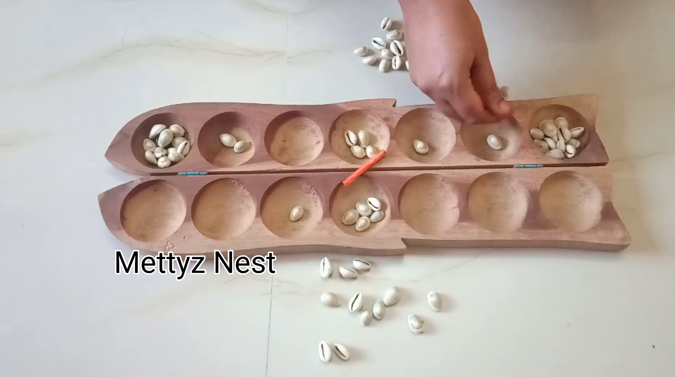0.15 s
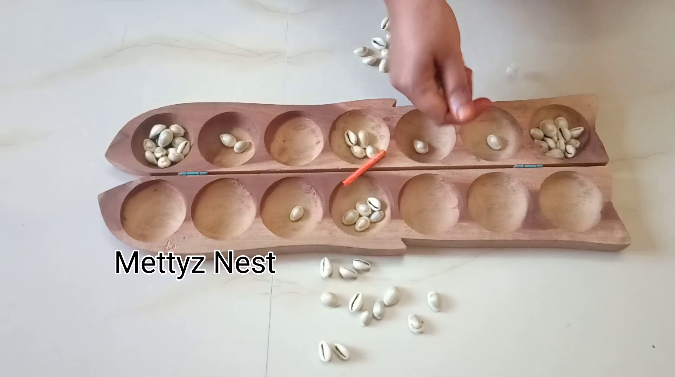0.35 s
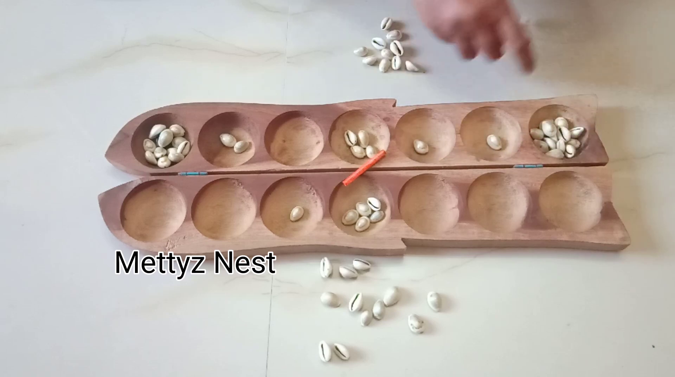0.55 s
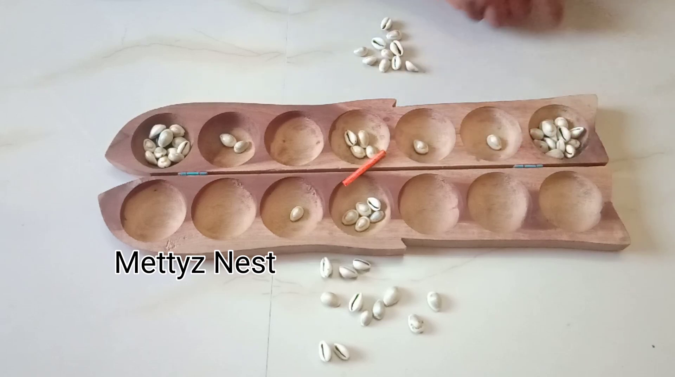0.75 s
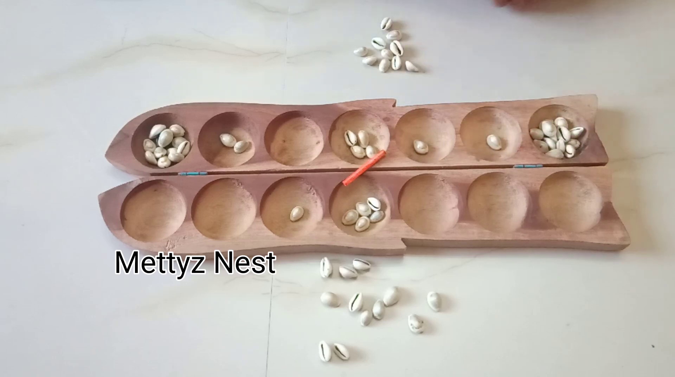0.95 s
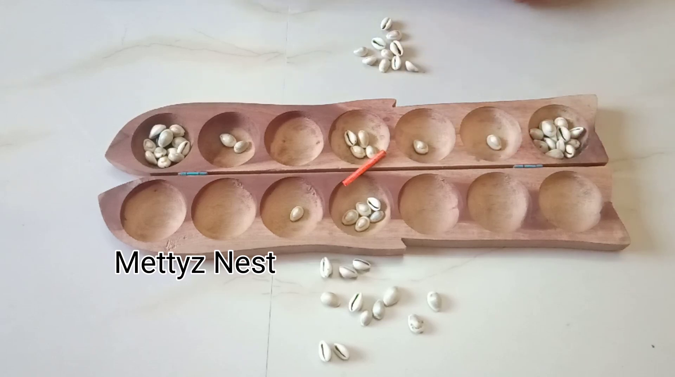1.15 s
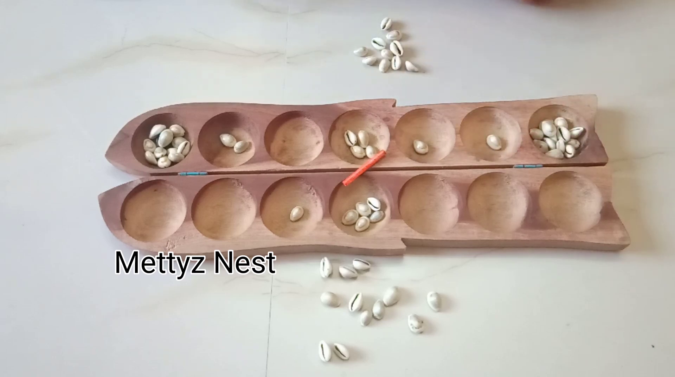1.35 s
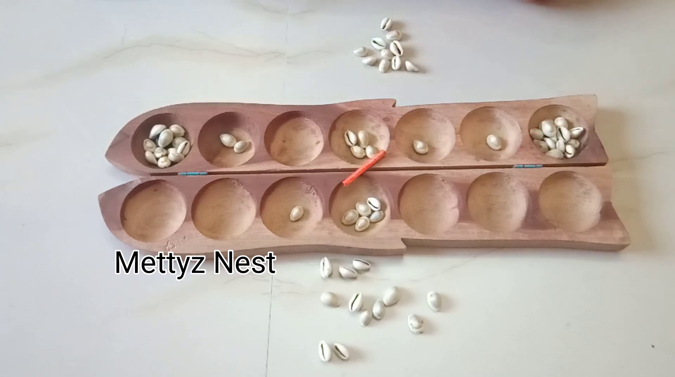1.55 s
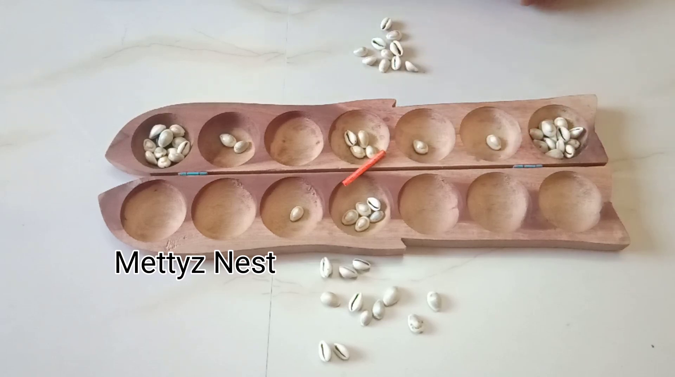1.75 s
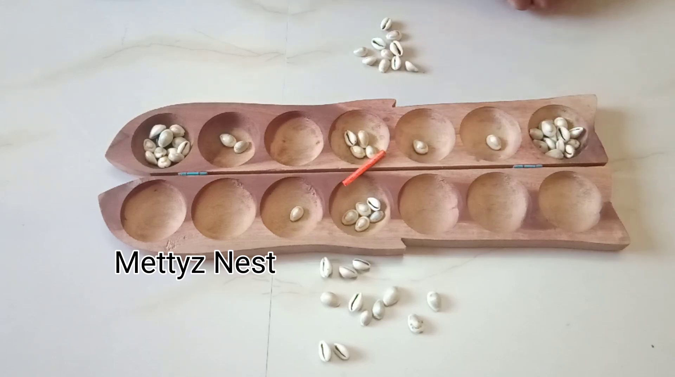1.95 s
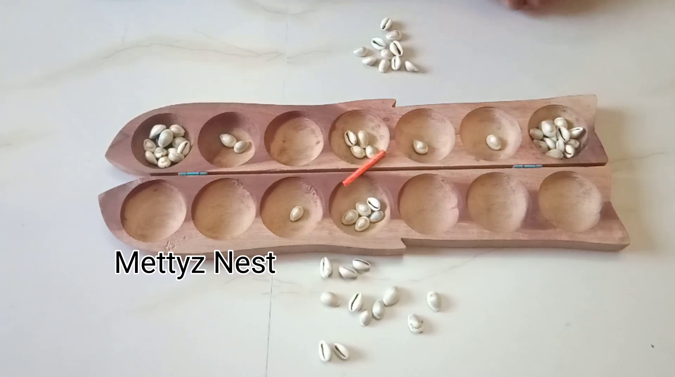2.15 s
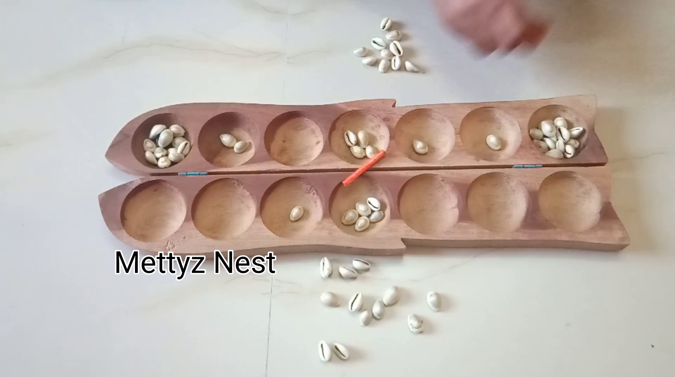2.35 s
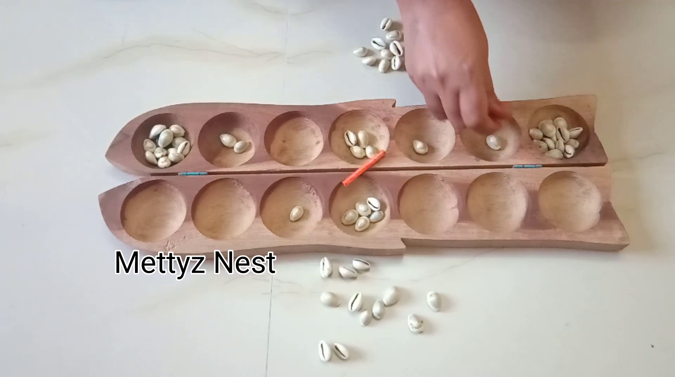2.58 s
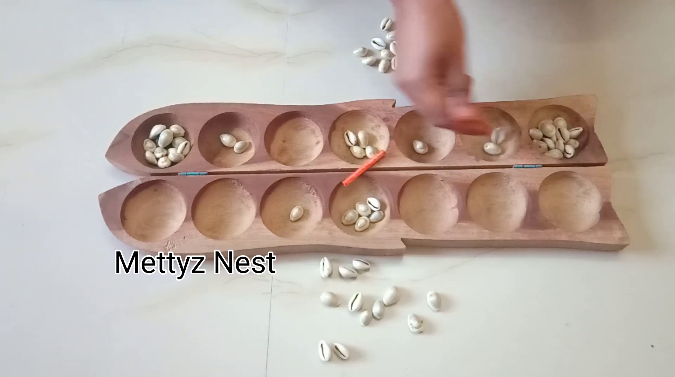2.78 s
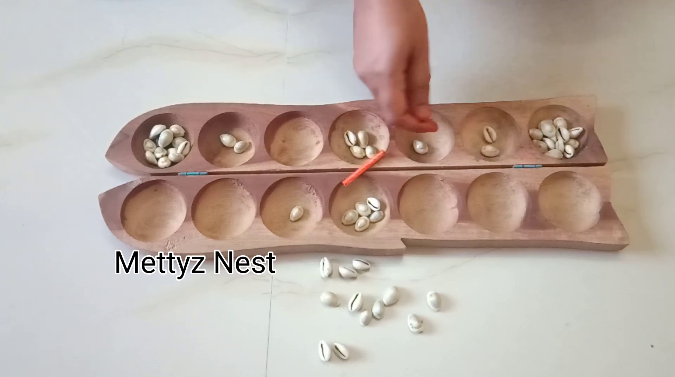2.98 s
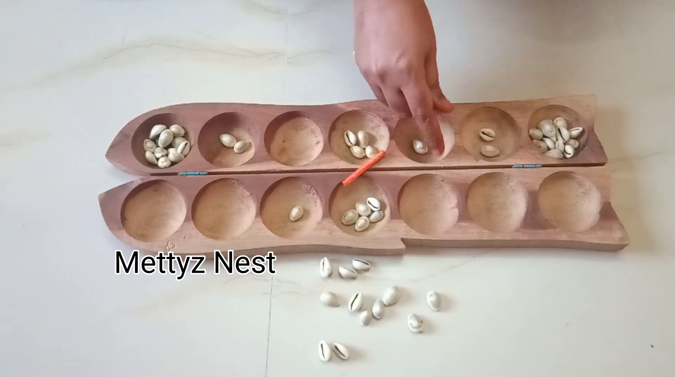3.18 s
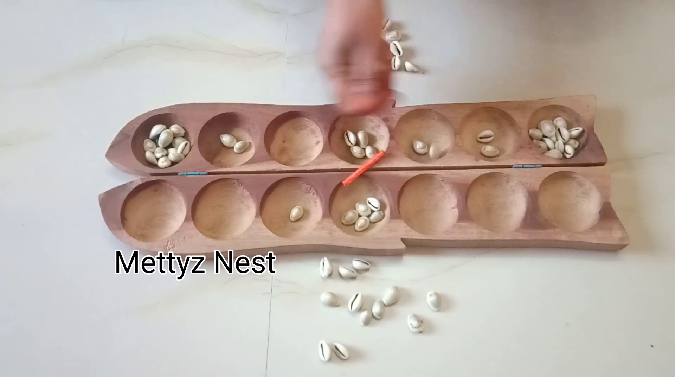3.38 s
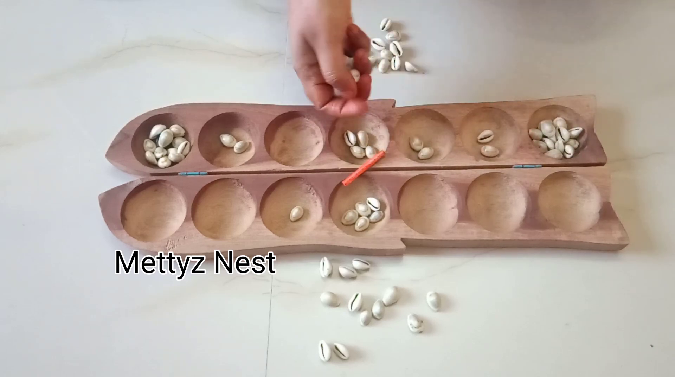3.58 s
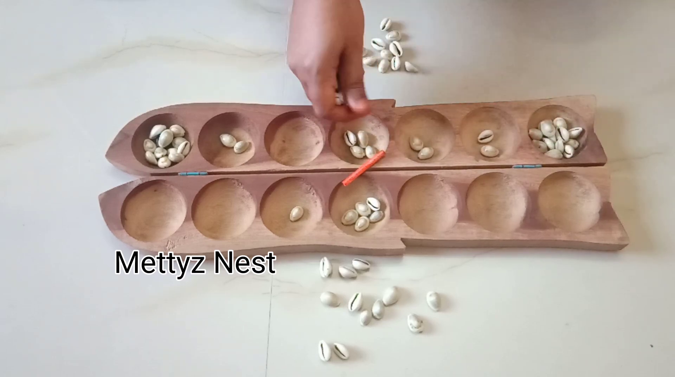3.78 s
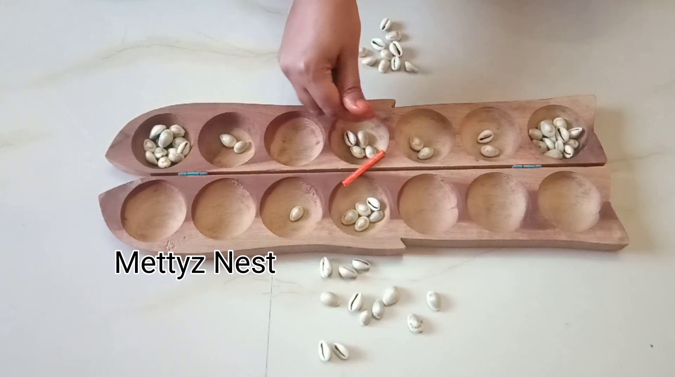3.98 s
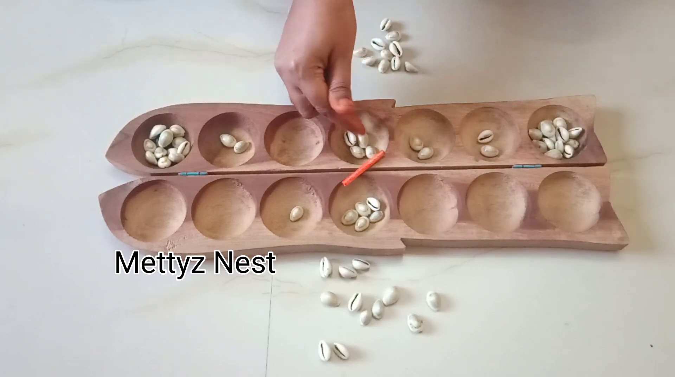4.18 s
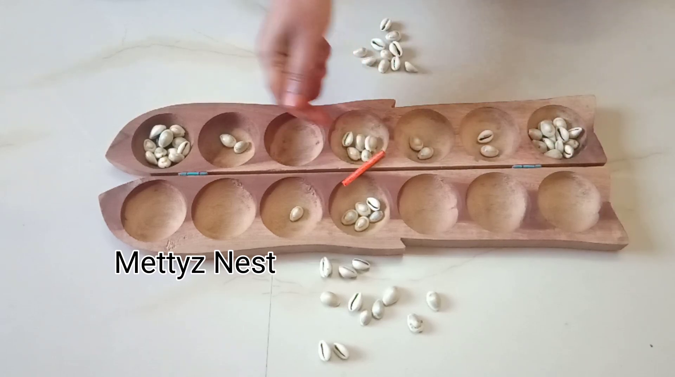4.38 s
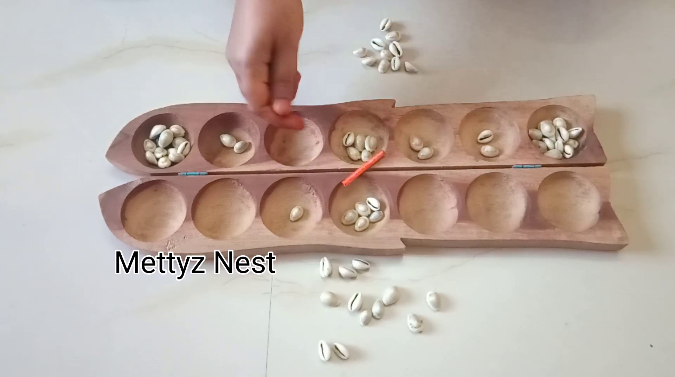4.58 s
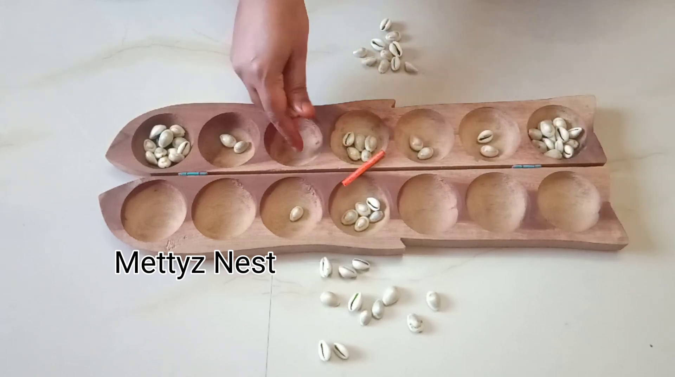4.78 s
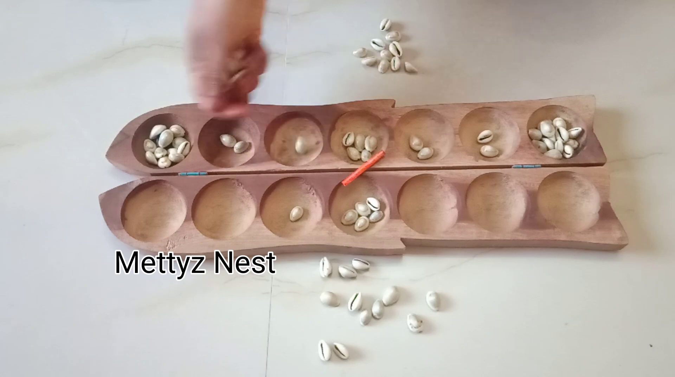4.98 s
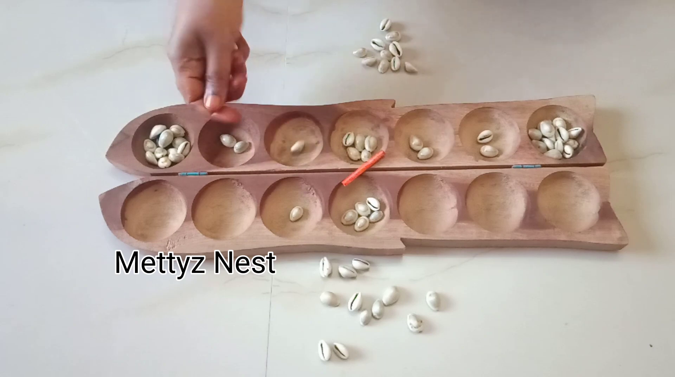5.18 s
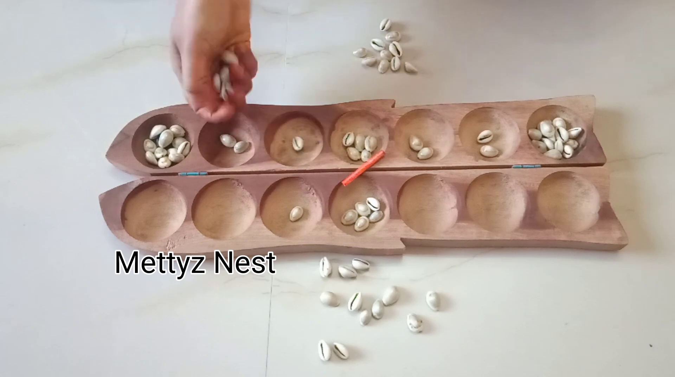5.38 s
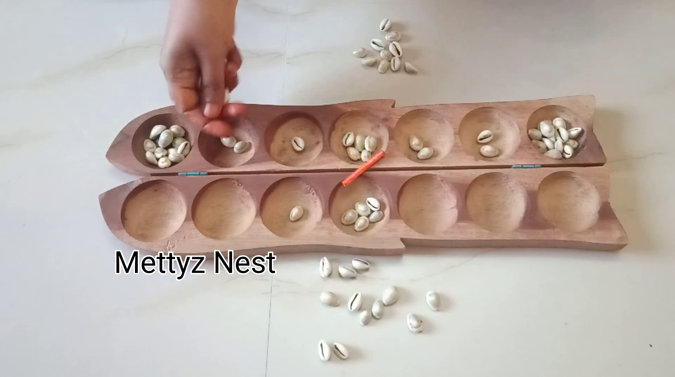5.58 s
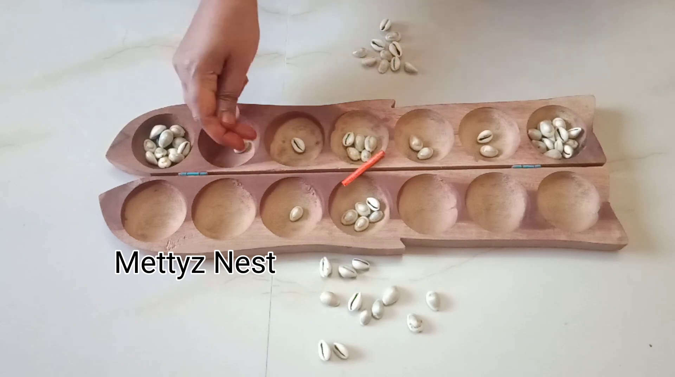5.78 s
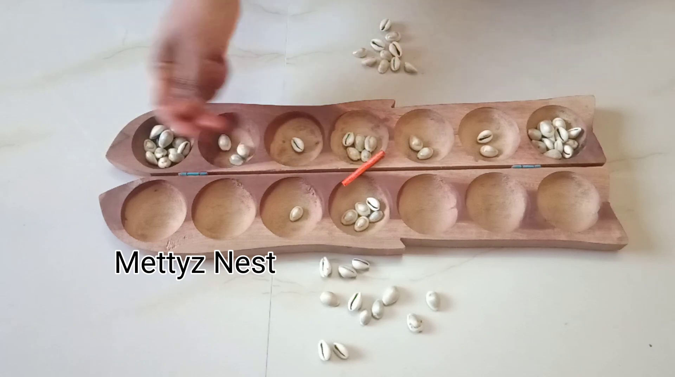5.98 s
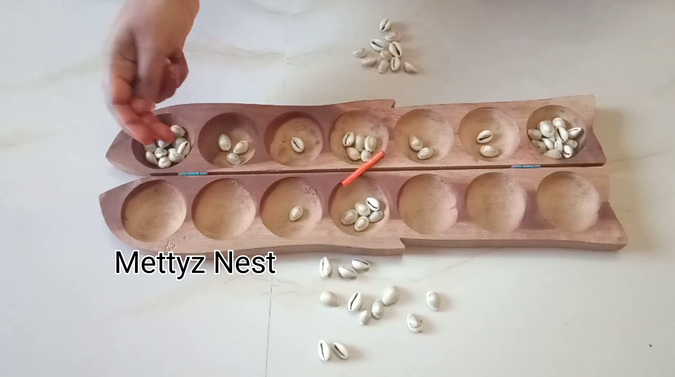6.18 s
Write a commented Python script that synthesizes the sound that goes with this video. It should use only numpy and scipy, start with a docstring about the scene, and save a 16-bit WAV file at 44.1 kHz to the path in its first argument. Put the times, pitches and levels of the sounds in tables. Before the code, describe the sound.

Sharp woody clacks of small shells landing one by one in a pitted board, after one stray shell bounces over tiled floor, in a reverberant room.

```python
"""Hard room with a tiled floor: cowrie shells drop one at a time onto a wooden board with pits.
The first drop glances off the rim, snaps away over the tiles and rocks to rest; five later drops land in pits
and rattle. Shells and wood are damped modes plus coloured noise ticks; shells clink and shuffle in the hand.
Rubs, air and hiss are filtered noise, mains hum and a faint far whistle are wavering sines.
Scattered decaying reflections ring after the shells and the whistle."""
import sys
import numpy as np
from scipy import signal
from scipy.fft import rfft, irfft
from scipy.io import wavfile
from scipy.ndimage import uniform_filter1d

SR = 44100
rng = np.random.default_rng(int(sys.argv[2]) if len(sys.argv) > 2 else 0)


def int16_out(signal):
    """Quantize to a 16-bit WAV file."""
    q = np.round(np.clip(np.atleast_2d(signal).T, -1, 1) * 32767)
    wavfile.write(sys.argv[1], SR, q.astype(np.int16))


N = 274743
HIT_S = np.arange(2048) / SR  # time axis of one contact


def amp(db):
    """Decibels to gain."""
    return 10 ** (np.asarray(db) / 20)


def unit(x):
    """Scales to rms 1."""
    return x / np.sqrt(np.mean(x ** 2) + 1e-20)


def blow(x, size=176):
    """Scales a hit to rms 1 over its first 4 ms."""
    return x / np.sqrt(np.mean(x[:size] ** 2) + 1e-20)


def read(points, hz):
    """Interpolates a table on a log-frequency axis."""
    f, value = np.transpose(points)
    return np.interp(np.log(hz + 1), np.log(f + 1), value)


def add(mix, s, sound):
    """Mixes a sound in at time s."""
    part = mix[max(round(s * SR), 0):][:len(sound)]
    part += sound[:len(part)]


def noise(spectrum):
    """Steady noise of a given colour, rms 1."""
    gain = amp(read(spectrum, np.fft.rfftfreq(N, 1 / SR)))
    return unit(irfft(rfft(rng.standard_normal(N)) * gain, N))


def ring(modes, scatter_rad, detune, rise_s=0.0001):
    """Damped modes; each contact lands differently, so strengths, pitches and phases scatter."""
    hz, db, t60_s = np.transpose(modes)[:, :, None]
    size, pitch, phase = rng.standard_normal((3, len(hz), 1))
    mode_hz = hz * (1 + detune * pitch)
    waves = np.sin(2 * np.pi * mode_hz * (HIT_S - 2 * rise_s) + scatter_rad * phase)
    decay = amp(db + 2 * size - 60 * HIT_S / t60_s)
    onset = 1 - np.exp(-(HIT_S / rise_s) ** 2)
    return blow((decay * waves).sum(0) * onset)


def tick(spectrum, decay_s, grit):
    """A sharp contact with a brief gritty slide, given a causal (minimum-phase) colour."""
    push = grit * rng.standard_normal(len(HIT_S)) * np.exp(-HIT_S / decay_s)
    push[0] += 1
    log_gain = np.log(amp(read(spectrum, abs(np.fft.fftfreq(len(HIT_S), 1 / SR)))))
    colour = np.exp(np.conj(signal.hilbert(log_gain)))
    contact = np.fft.ifft(np.fft.fft(push) * colour).real
    return blow(np.roll(contact, len(HIT_S) // 256))


# room air spectrum: (frequency [Hz], relative density [dB per Hz])
AIR_SPECTRUM = [(15, -62), (25, -18), (82, -3), (153, -4), (185, -3), (217, -6.5), (363, -9), (531, -10),
                (607, -11), (695, -12), (1330, -13.5), (2160, -15.5), (2990, -15.5), (5280, -38),
                (16000, -49)]
# hiss spectrum: (frequency [Hz], relative level [dB])
HISS_SPECTRUM = [(3000, -28), (3700, 22.5), (4400, 7), (5600, -61), (7000, -6), (7800, 4.5), (9000, -0.5),
                 (11000, -32), (15000, -30)]
# mains hum: (frequency [Hz], rms level [dB])
MAINS_HUM = [(120, -56), (180, -54.5)]


def background(air_db=-46.5, hiss_db=-64, waver=0.17):
    """Room air, a little hiss and mains hum whose level wavers slowly."""
    t = np.arange(N) / SR
    slow = [(1, 0), (5, 0), (20, -40), (200, -120)]  # (Hz, dB)
    hum = np.zeros(N)
    for hz, db in MAINS_HUM:
        tone = np.sqrt(2) * np.sin(2 * np.pi * hz * t)
        hum += amp(db) * tone * (1 + waver * noise(slow))
    return amp(air_db) * noise(AIR_SPECTRUM) + amp(hiss_db) * noise(HISS_SPECTRUM) + hum


# rubs and rumble as the arm moves over the board:
# (start [s], end [s], centre [Hz], width [Hz], level [dB])
ARM_RUBS = [(0.0, 0.127, 123, 69.6, -43.5), (1.544, 1.896, 1990, 700, -56), (3.102, 3.478, 1810, 790, -50),
            (4.872, 5.149, 1390, 450, -45.5), (5.899, 6.257, 126, 123, -45)]


def rubbing():
    """Brief swells of soft friction noise, each around one resonance."""
    out, f = np.zeros(N), np.fft.rfftfreq(N, 1 / SR)
    for start_s, end_s, hz, width_hz, db in ARM_RUBS:
        n = int((end_s - start_s) * SR)
        resonance = 1 / (1 + (2 * (f - hz) / width_hz) ** 2)
        rub = unit(irfft(rfft(rng.standard_normal(N)) * resonance, N))
        add(out, start_s, amp(db) * rub[:n] * signal.windows.tukey(n, .6))
    return out


# shell modes, body and high ring: (frequency [Hz], relative level [dB], t60 [s])
SHELL_BODY_MODES = [(2630, 2, 0.0064), (3060, -1, 0.01), (3500, -3, 0.024), (4160, 4.5, 0.0073),
                    (4230, -44, 0.014), (4700, -23, 0.024)]
SHELL_RING_MODES = [(5200, -8, .004), (6100, -7, .004), (6900, -6, .004), (7450, -1, .005), (7900, 0, .005),
                    (8400, -2, .005), (9000, -5, .004), (9700, -8, .004)]
# bare shell contact: (frequency [Hz], relative level [dB])
TICK_SPECTRUM = [(500, -66), (5000, -77), (7000, 17.5), (10000, 10), (12500, 8.5), (15200, 8.5),
                 (17000, 11)]


def clink(db, edge_db, slide_db=-5, ring_db=-15, tick_db=-4.5):
    """Two ribbed shells touch, slide a little and touch again; no two have quite the same pitch."""
    touch = ring(SHELL_BODY_MODES, scatter_rad=1.66, detune=0.024, rise_s=0.000307)
    high = ring(SHELL_RING_MODES, scatter_rad=0.36, detune=0.035, rise_s=0.000302)
    touch += amp(edge_db + ring_db) * high
    slide_s = rng.uniform(0.001785, .007)
    again = ring(SHELL_BODY_MODES, scatter_rad=1.0, detune=0.072)
    add(touch, slide_s, amp(slide_db) * again)
    contact = tick(TICK_SPECTRUM, decay_s=0.002, grit=3.2)
    return amp(db) * (touch + amp(edge_db + tick_db) * contact)


# distinct shell-on-shell clinks: (time [s], strength [dB], edge [dB])
HAND_CLINKS = [(0.1671, -39, 10.5), (3.0054, -24, -3), (3.0084, -25.5, 3), (3.7601, -35, 1.5),
               (3.7788, -26, -2.5), (3.9573, -39, -2), (4.172, -39, 3.5), (4.464, -30, -2.5),
               (4.6462, -37, 0), (4.683, -36.5, -0.5), (5.546, -32, -6.5), (5.5791, -29.5, -7),
               (5.6166, -31, 0.5)]
# fingers shifting the shells: (start [s], length [s], strength [dB], edge [dB])
HAND_SHUFFLES = [(0.0, 0.055, -37, -2), (0.114, .05, -48.5, 8), (1.722, 0.061, -56, -1),
                 (1.932, 0.007, -52, 7), (2.111, 0.11, -52, -1), (3.568, 0.14, -37.5, 1.5),
                 (3.947, 0.06, -43, -1.5), (4.572, 0.19, -43.5, 3), (5.159, .12, -30, -1.5),
                 (5.289, 0.12, -52, 6), (5.502, 0.19, -41, 5.5)]


def hand(grains_per_s=260, spread_db=14, swell_db=9):
    """Single clinks, and swelling clumps of tiny contacts as the fingers feed the next shell forward."""
    out = np.zeros(N)
    for s, db, edge_db in HAND_CLINKS:
        add(out, s, clink(db, edge_db))
    for start_s, length_s, db, edge_db in HAND_SHUFFLES:
        grains = rng.random((int(length_s * grains_per_s) + 1, 2))
        for when, softness in grains:
            ebb_db = swell_db * (2 * when - 1) ** 2
            grain = clink(db - ebb_db - spread_db * softness, edge_db)
            add(out, start_s + when * length_s, grain)
    return out


# shell landings, spot 0 = rim, spots 1-5 = pits; edge = share of the blow on the hard lip:
# (time [s], strength [dB], edge [dB], dull thud [dB], rattle length [s], rattle below landing [dB])
SHELL_DROPS = [(0.2294, -11.5, -2, -27, 0.0086, 2.5), (2.788, -12, 1, -23, 0.17, 27),
               (3.401, -14, -10, -11.5, 0.26, 14.5), (4.2964, -12.5, -1.5, -14, 0.15, 14.5),
               (4.9852, -9, -6.5, -16, .29, 24), (5.9873, -10, -1, -13.5, 0.25, 17)]


def spot_at(s):
    """Spot on the board of the latest landing by time s."""
    return sum(row[0] <= s for row in SHELL_DROPS[1:])


# wood modes: (frequency [Hz], relative level when struck at spots 0 to 5 [dB] x 6)
BOARD_MODES = [(1280, -33, -21, -17, -27, -12, -25), (1480, -11.5, -15, -7, -16.5, -24, -13.5),
               (2125, -6, -33, 1.5, -14, -6, 1), (2224, 0.5, -3.5, 0, -6, -0.5, -10),
               (2570, -1.5, -10, 4, -23, -11, -35), (2750, -7, -16, -15, -1.5, 2, -7),
               (2980, 1, -16, 6, -5, -3, 5), (3290, -10, -33, -37, 3, -19, 1.5),
               (3487, 6, -5, 12, -5, 5.5, -1), (3763, -5.5, 1, -19, 2.5, -6.5, 2),
               (3936, -3.5, -17, 0, 3, -5.5, -2), (4575, -12, -24, -15, -5.5, -14, -8.5)]
# dull contact with the wood: (frequency [Hz], relative level [dB])
THUD_SPECTRUM = [(60, -27), (200, 1), (450, -3.5), (900, 0), (1400, 10), (2500, 4), (4500, 9.5),
                 (6000, -11), (9000, -34)]


def knock(spot, db, edge_db, wander=0, wood_t60_s=0.016, ring_db=-9.5, tick_db=-21):
    """The struck spot sets which wood modes speak, less so as the shell wanders; the shell rings above."""
    modes = []
    for hz, *levels in BOARD_MODES:
        level_db = (1 - wander) * levels[spot] + wander * np.mean(levels)
        modes.append((hz, level_db, wood_t60_s))
    thud_db = SHELL_DROPS[spot][3]
    wood = ring(modes, scatter_rad=1.54, detune=0.027, rise_s=0.000491)
    wood += amp(thud_db) * tick(THUD_SPECTRUM, decay_s=0.0023, grit=0.065)
    shell = amp(ring_db) * ring(SHELL_RING_MODES, scatter_rad=1.5, detune=0.011, rise_s=0.000418)
    contact = amp(tick_db) * tick(TICK_SPECTRUM, decay_s=0.0072, grit=1.24)
    return amp(db) * (wood + amp(edge_db) * (shell + contact))


# hard rebounds that stand out of the rattles: (time [s], strength [dB], edge [dB])
HARD_REBOUNDS = [(2.7967, -16, -6), (2.8814, -23, -26), (2.9066, -25.5, -22), (2.9205, -23, -7.5),
                 (2.9434, -26.5, -22), (3.4063, -14, -6.5), (3.473, -19.5, -9.5), (3.5528, -24, -5.5),
                 (3.5824, -21.5, -7), (3.6188, -25, -3), (3.6492, -26.5, -1), (4.3062, -18, -5),
                 (4.3467, -18, -8), (4.3842, -19, 1), (5.0012, -28, -16), (5.0739, -15.5, -4),
                 (5.1529, -22.5, -15), (5.1698, -22.5, -16), (5.2036, -25, -14), (5.229, -22.5, -2),
                 (6.0039, -21.5, -9), (6.0349, -16.5, -16), (6.0773, -27, -18), (6.1888, -26, -7.5),
                 (6.224, -28.5, -5)]


def board(rebound_wander=0.24, rattle_wander=0.46, delay_s=.009, taps_per_s=65, fade_db=4.5, rattle_edge_db=-15):
    """Drops land; those in pits rebound and rattle in light irregular taps that fade evenly in dB."""
    out = np.zeros(N)
    for s, db, edge_db in HARD_REBOUNDS:
        add(out, s, knock(spot_at(s), db, edge_db, rebound_wander))
    for spot, (s, db, edge_db, _, length_s, below_db) in enumerate(SHELL_DROPS):
        add(out, s, knock(spot, db, edge_db))
        for age_s in np.arange(delay_s, length_s, 1 / taps_per_s):
            tap_db = db - below_db - fade_db * age_s / length_s + rng.uniform(-5.32, 4)
            tap_s = s + age_s + rng.random() / taps_per_s
            add(out, tap_s, knock(spot, tap_db, rattle_edge_db, rattle_wander))
    return out


# stray shell bouncing on tile: (time [s], strength [dB])
TILE_BOUNCES = [(0.3496, -26), (0.4667, -33), (0.55, -39.5), (0.5865, -35.5), (0.6293, -41),
                (0.6567, -37.5), (0.715, -38.5), (0.73, -33.5), (0.771, -41.5), (0.824, -40)]
# shell body against tile: (frequency [Hz], relative level [dB], t60 [s])
TILE_BODY_MODES = [(2600, -5, .004), (3300, -3, .004), (4100, -1, .005), (4650, -1, .005), (5150, -3, .007)]
# tile snap, and dull push of the floor: (frequency [Hz], relative level [dB])
TILE_TICK_SPECTRUM = [(100, -24), (700, -28), (2500, -19), (6300, -3), (7800, 10.5), (9800, 4),
                      (11300, 4.5), (12800, 3), (15000, 8.5), (17000, 1)]
FLOOR_THUD_SPECTRUM = [(60, -8), (300, 2), (700, 5), (1200, -11), (2000, -20), (5000, -40)]


def bouncing(body_db=-8, second_db=-13, thud_db=-14, thud_growth=5.0):
    """Hard tile hardly rings: each bounce is a thin bright snap, and the spinning shell touches twice."""
    out, hardest_db = np.zeros(N), max(db for _, db in TILE_BOUNCES)
    for s, db in TILE_BOUNCES:
        for delay_s, touch_db in ((0, 0), (rng.uniform(0.002, .014), second_db)):
            body = amp(body_db) * ring(TILE_BODY_MODES, scatter_rad=1.0, detune=0.19)
            snap = tick(TILE_TICK_SPECTRUM, decay_s=0.00097, grit=0.16)
            add(out, s + delay_s, amp(db + touch_db) * (body + snap))
        # only the hardest bounces move the floor audibly
        push_db = hardest_db + thud_db + thud_growth * (db - hardest_db)
        add(out, s, amp(push_db) * tick(FLOOR_THUD_SPECTRUM, decay_s=0.00092, grit=0.052))
    return out


# high ring of a lip on tile: (frequency [Hz], relative level [dB], t60 [s])
LIP_RING_MODES = [(11800, 1, 0.0057), (12300, -24, 0.0051), (13000, -18, .003), (15100, -10, 0.0056)]


def tip(body_db, ring_db, ring_trim_db=-9.0, snap_db=-3):
    """One lip of the stray shell meets the tile: body modes under a high ring and a snap."""
    snap = amp(snap_db) * tick(TICK_SPECTRUM, decay_s=0.00056, grit=1.6)
    top = ring(LIP_RING_MODES, scatter_rad=.9, detune=.02, rise_s=.0002)
    body = ring(TILE_BODY_MODES, scatter_rad=1.37, detune=0.028, rise_s=0.000216)
    return amp(body_db) * body + amp(ring_db + ring_trim_db) * (top + snap)


# hard tips from lip to lip: (time [s], body level [dB], high ring level before tip's trim [dB])
HARD_TIPS = [(0.9068, -30, -29.5), (0.9918, -47, -30.5), (1.0158, -39, -33), (1.0569, -39.5, -29),
             (1.116, -37, -33), (1.169, -37, -29.5), (1.1816, -39.5, -39), (1.198, -44, -31)]


def rocking(second_db=-9, chatter_db=-44, chatter_body_db=-2, uneven_db=3.5, jitter=.25):
    """The stray shell tips from lip to lip, each time rebounding once, and chatters ever faster to rest."""
    out = np.zeros(N)
    for s, body_db, ring_db in HARD_TIPS:
        add(out, s, tip(body_db, ring_db))
        add(out, s + rng.uniform(.005, 0.0074), amp(second_db) * tip(body_db, ring_db))
    from_s, to_s, first_per_s, last_per_s = .94, 1.33, 32, 100
    release_s, release_fade_db = 0.07, 18
    s = from_s
    while s < to_s:
        stopping = max(1 - (to_s - s) / release_s, 0)
        db = chatter_db - release_fade_db * stopping + uneven_db * rng.standard_normal()
        add(out, s, tip(db + chatter_body_db, db))
        per_s = np.interp(s, [from_s, to_s], [first_per_s, last_per_s])
        s += np.exp(jitter * rng.standard_normal()) / per_s
    return out


# faint far whistle: (start [s], end [s], start pitch [Hz], end pitch [Hz], level before the room [dB])
FAR_WHISTLES = [(1.6, 2.15, 3000, 3010, -62.5), (1.47, 2.05, 3380, 3440, -63)]


def whistles(waver=0.0074):
    """Thin gliding sines, far off, unsteady in pitch by smoothed noise."""
    out = np.zeros(N)
    for start_s, end_s, from_hz, to_hz, db in FAR_WHISTLES:
        n = int((end_s - start_s) * SR)
        wobble = unit(uniform_filter1d(rng.standard_normal(n), size=300))
        hz = np.linspace(from_hz, to_hz, n) * (1 + waver * wobble)
        tone = np.sin(2 * np.pi * np.cumsum(hz) / SR)
        add(out, start_s, amp(db) * tone * signal.windows.tukey(n, .5))
    return out


# decay: (frequency [Hz], t60 before the length factor [s])
ROOM_DECAY = [(200, .5), (1500, .48), (3000, .44), (8000, .39), (14000, .31)]
# tail colour: (frequency [Hz], relative level [dB])
TAIL_COLOUR = [(200, -32), (1500, -3), (2300, -4), (3600, -6), (5500, -4), (8000, -6.5), (14000, -5)]
# first echoes from floor and nearby surfaces: (delay [s], gain before the wet level [-])
FIRST_ECHOES = [(.0045, 0.21), (.0072, -0.12), (.0125, 0.22), (.0165, -0.21), (.0205, .14), (.0235, -.12)]


def room(x, wet_db, length, build_s=0.0014, gap_s=0.00063):
    """Direct sound, first echoes, then reflections that thicken quickly and die faster in the treble."""
    t = np.arange(SR) / SR
    onset = 1 - np.exp(-(np.maximum(t - gap_s, 0) / build_s) ** 2)
    strengths = rng.standard_normal(SR)
    present = rng.random(SR) < .03 + 3 * t
    taps = strengths * present * onset
    hz, age_s, z = signal.stft(taps, SR, nperseg=256)
    faded = z * amp(-60 * age_s / (length * read(ROOM_DECAY, hz))[:, None])
    plain = signal.istft(faded, SR, nperseg=256)[1]
    coloured = signal.istft(faded * amp(read(TAIL_COLOUR, hz))[:, None], SR, nperseg=256)[1]
    tail = coloured / np.linalg.norm(plain)
    for delay_s, gain in FIRST_ECHOES:
        add(tail, delay_s, np.array([gain]))
    return x + amp(wet_db) * signal.fftconvolve(x, tail)[:N]


def scene():
    """Shells and whistle ring in the room, each with its own tail length; rubs and background stay dry."""
    pits = room(board(), wet_db=-1.0, length=0.75)
    held = room(hand(), wet_db=-2, length=0.73)
    stray = room(bouncing(), wet_db=-2.0, length=0.84) + room(rocking(), wet_db=-2.5, length=0.59)
    far = room(whistles(), wet_db=9.5, length=1)
    return (pits + held + stray + far + rubbing() + background())[None]


def record(dry, ceiling=0.96, edge_hz=15800):
    """The hardest landings overload the microphone softly; then a low-pass sets the band limit."""
    held = dry / (1 + (dry / ceiling) ** 6) ** (1 / 6)
    lowpass = signal.firwin(255, edge_hz, window=("kaiser", 9), fs=SR)
    return signal.oaconvolve(held, lowpass[None], "same")


dry = scene()
out = record(dry)
int16_out(out)
```